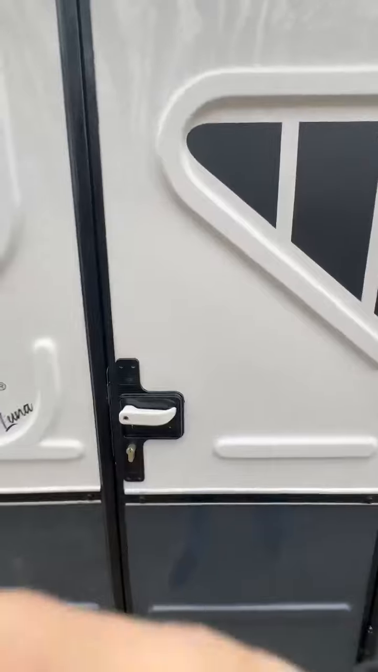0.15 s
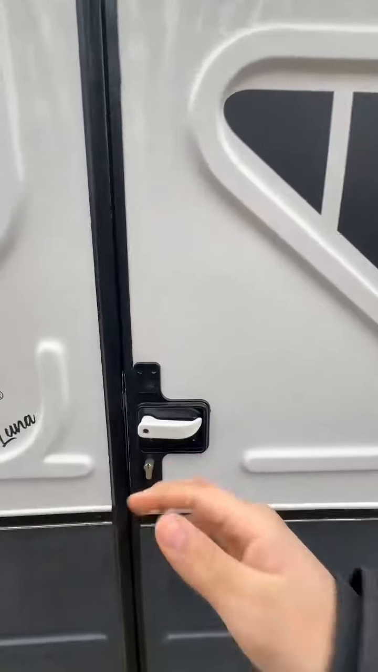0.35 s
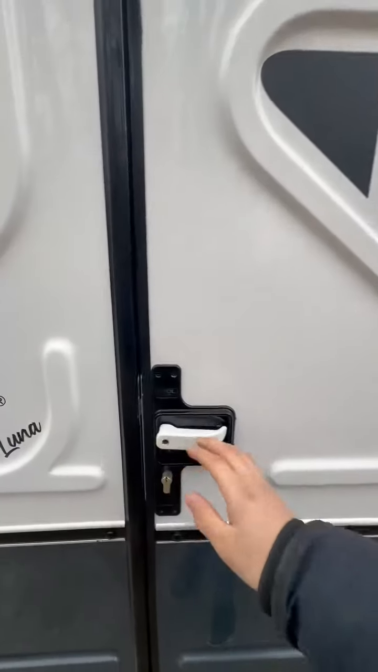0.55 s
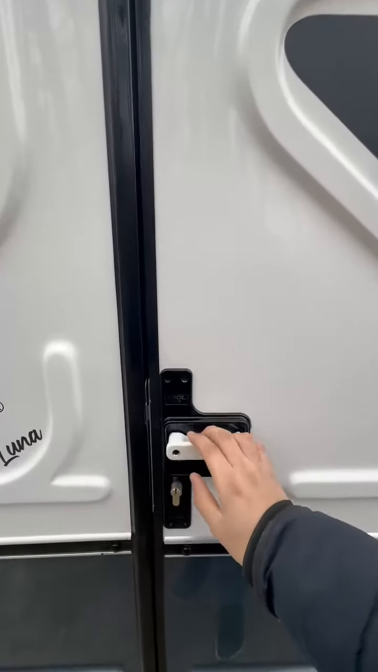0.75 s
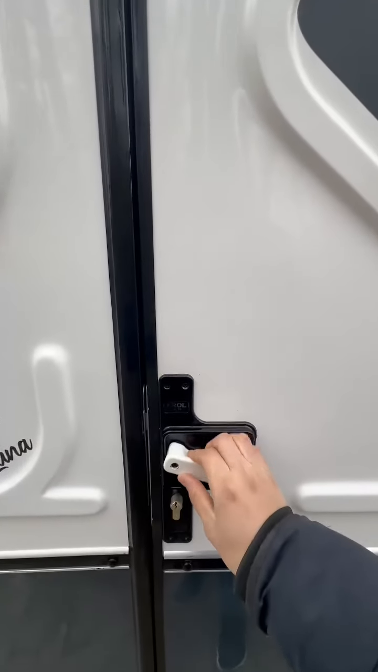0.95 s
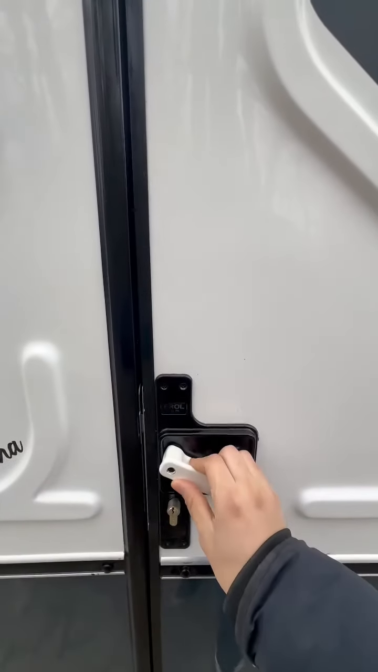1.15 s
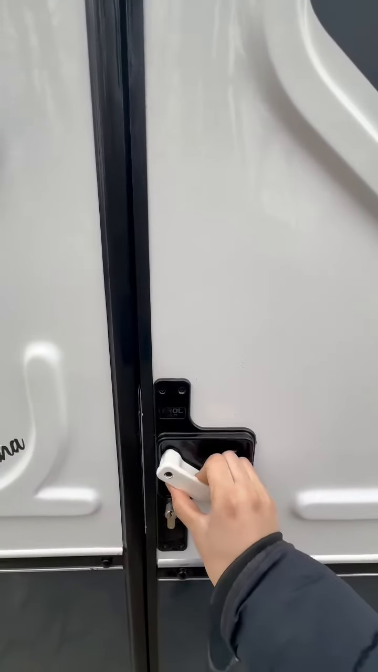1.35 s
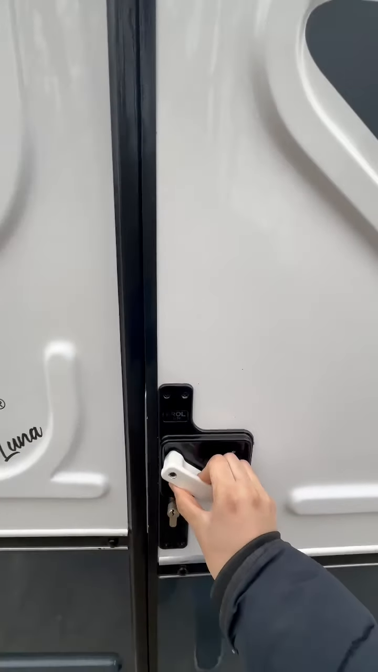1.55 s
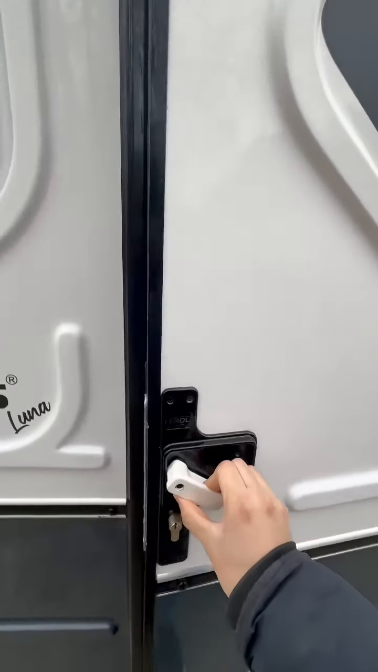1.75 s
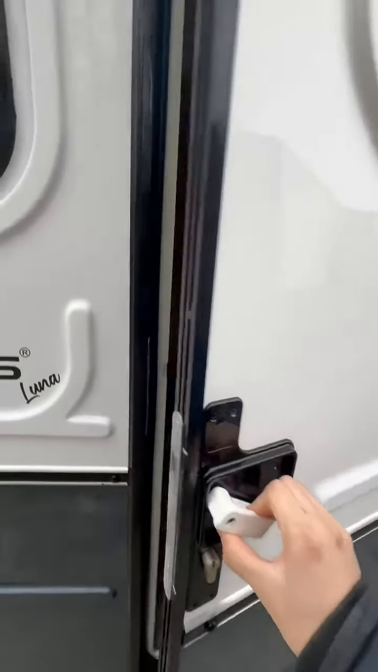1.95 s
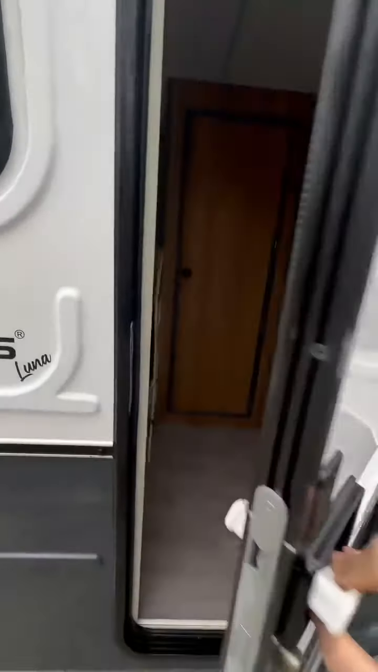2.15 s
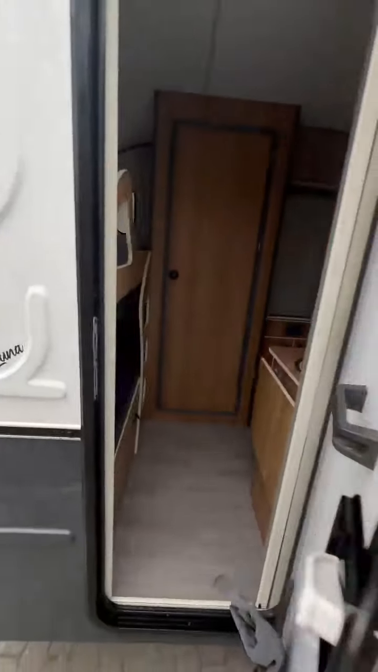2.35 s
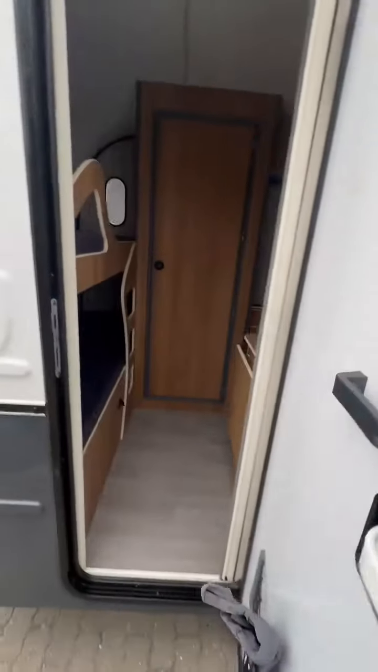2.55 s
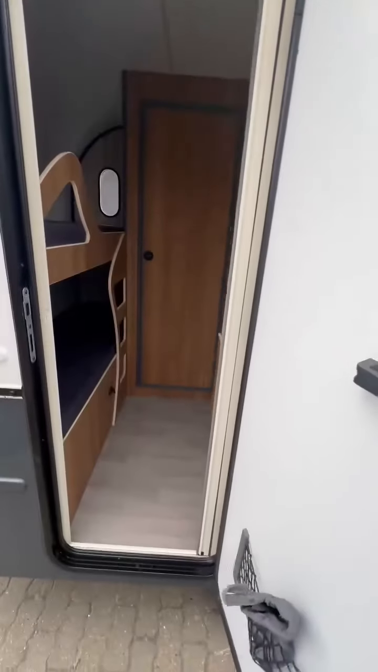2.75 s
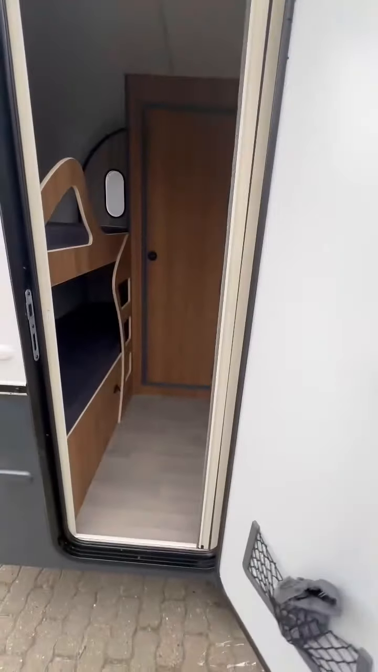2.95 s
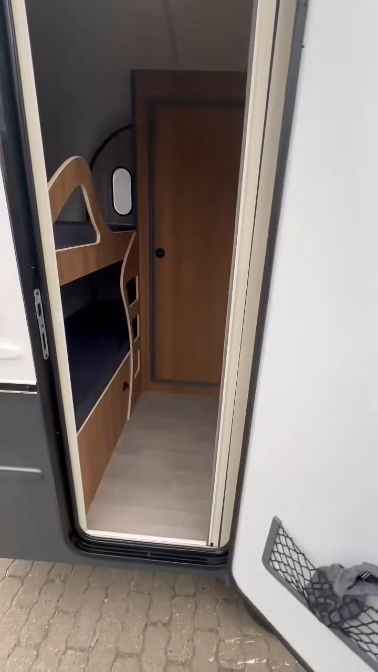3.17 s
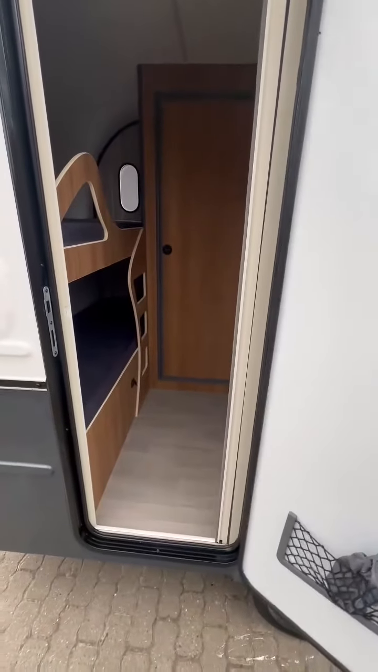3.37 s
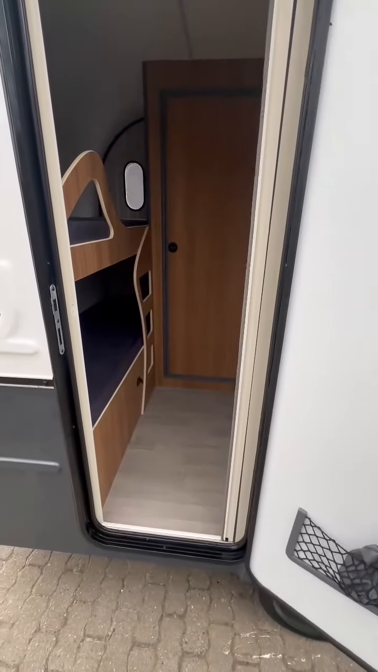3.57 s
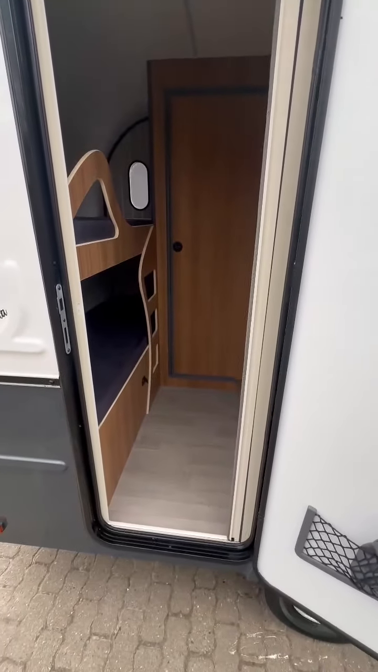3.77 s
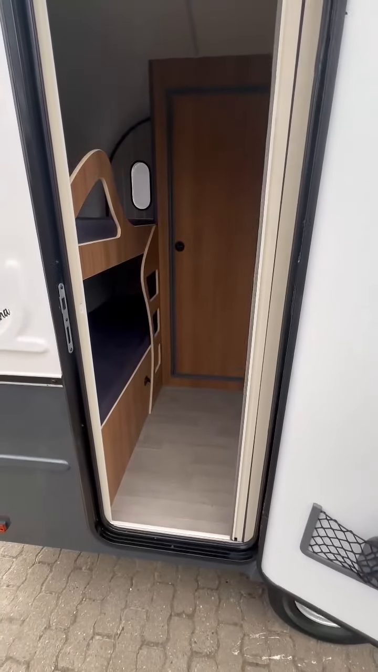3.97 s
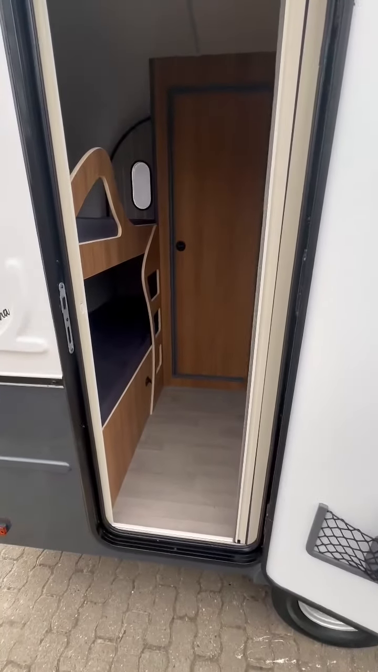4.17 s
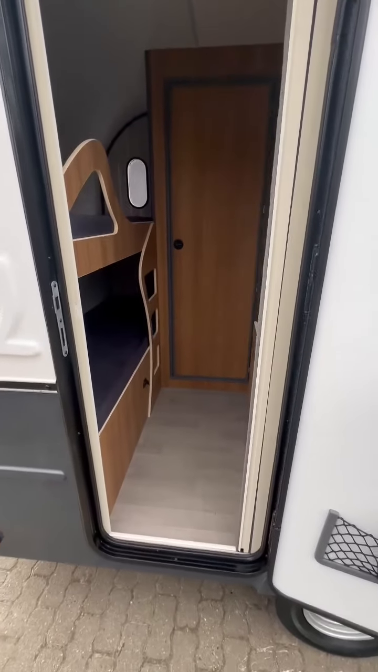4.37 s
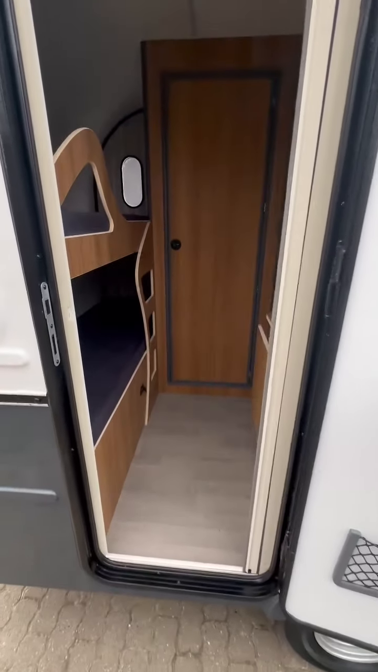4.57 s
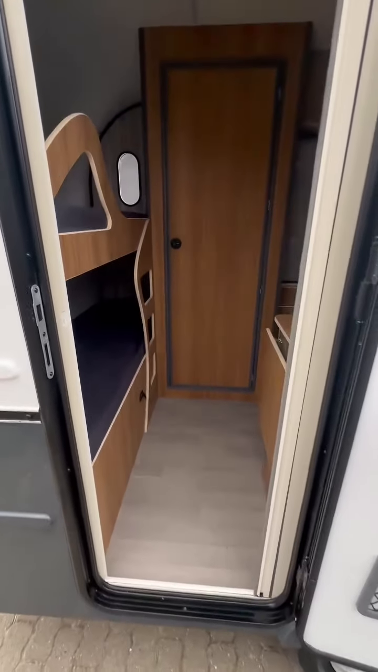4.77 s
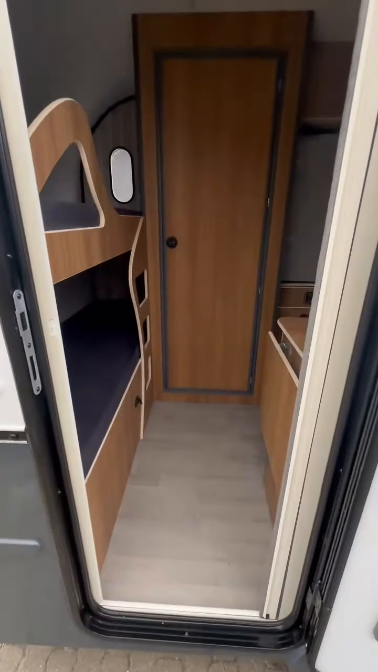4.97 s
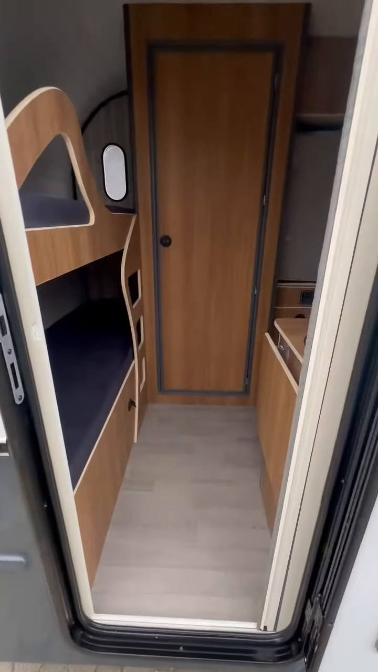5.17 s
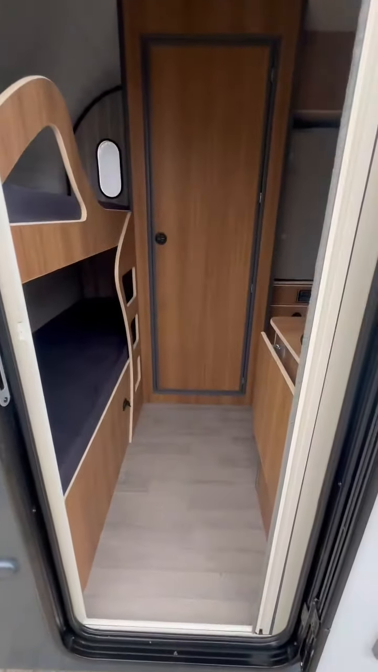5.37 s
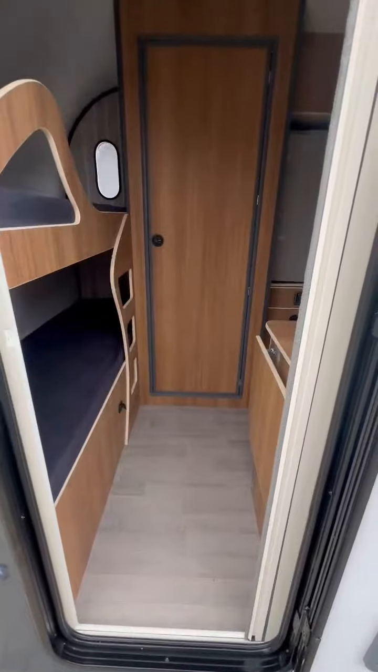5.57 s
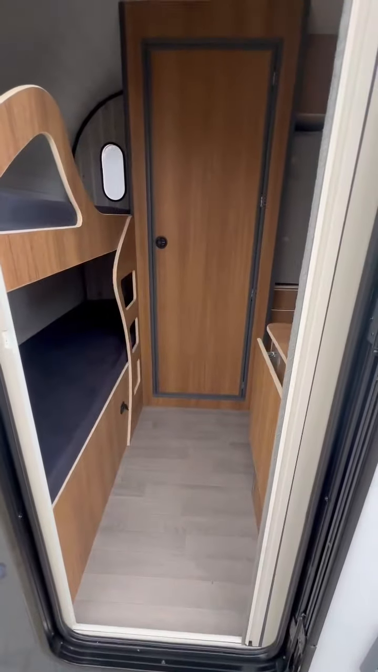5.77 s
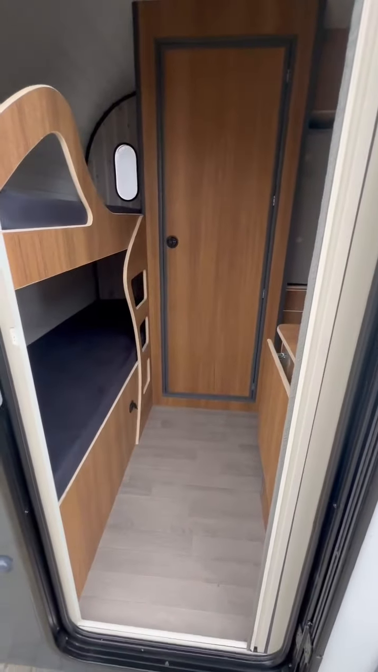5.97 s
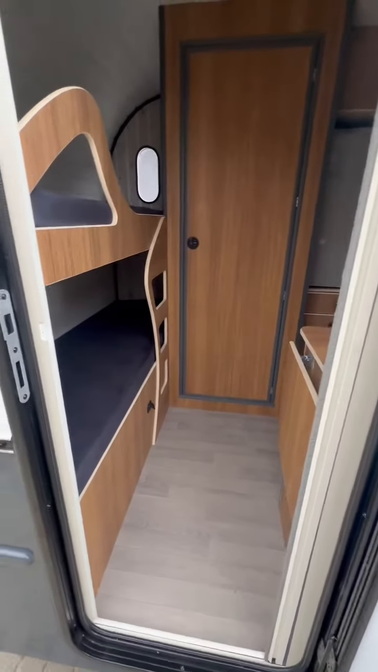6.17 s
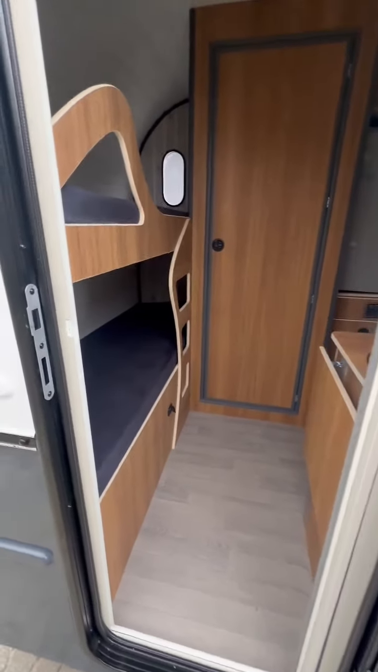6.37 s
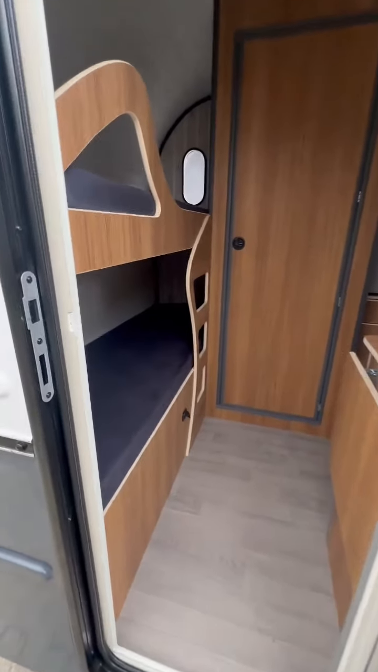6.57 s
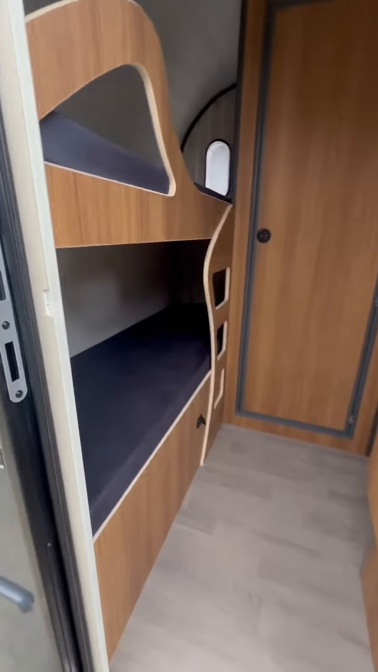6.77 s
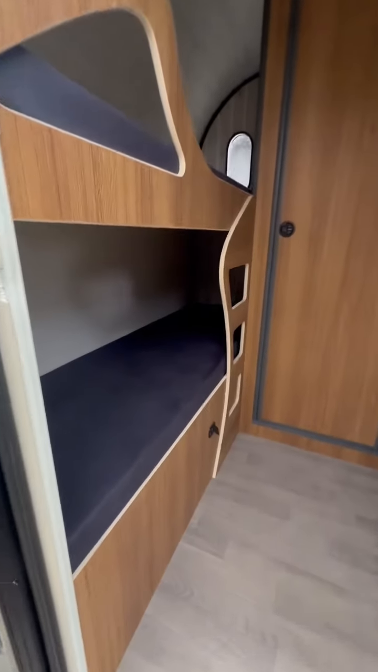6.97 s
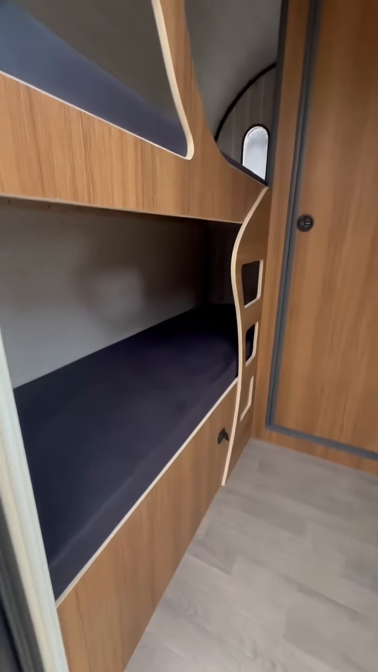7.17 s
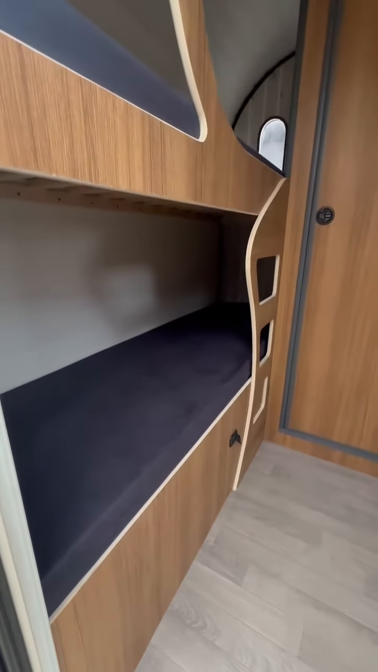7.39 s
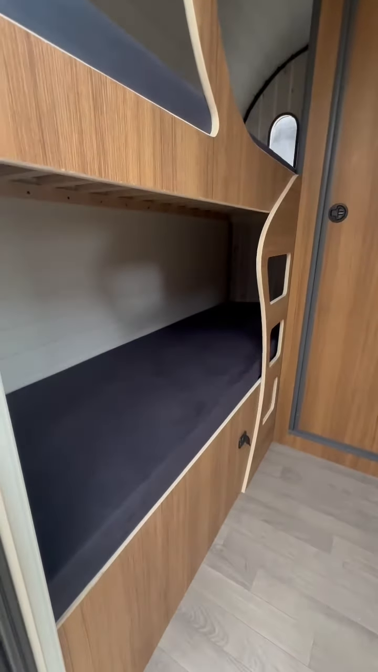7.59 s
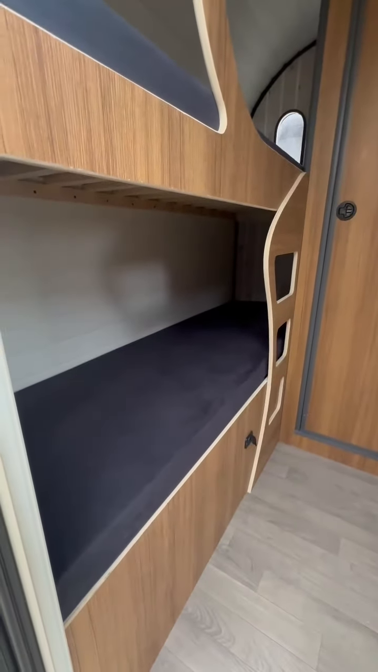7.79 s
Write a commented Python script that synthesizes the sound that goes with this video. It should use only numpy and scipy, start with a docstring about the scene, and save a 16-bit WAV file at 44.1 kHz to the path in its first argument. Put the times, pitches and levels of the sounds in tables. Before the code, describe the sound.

A caravan door latch clicks and snaps open, then the door creaks, bumps and rattles, over low wind rumble.

```python
"""A caravan door, worked by hand outdoors: the handle clicks, the bolt snaps free, the light panel booms.
Each hit is a sharp crack layered with ringing steel and a low body. The door creaks open in stick-slip
pulses, then bumps and rattles at the end of its swing. A jacket hisses faintly as the person moves,
a sleeve rustles and a shoe scuffs on grit.
Underneath, wind rumbles on the microphone and two small birds whistle far off."""
import sys
import numpy as np
from scipy import signal
from scipy.fft import rfft, irfft, next_fast_len
from scipy.io import wavfile
from scipy.ndimage import uniform_filter1d, map_coordinates

SR = 44100
rng = np.random.default_rng(int(sys.argv[2]) if len(sys.argv) > 2 else 0)


def dump(signal):
    """Clip the signal to [-1, 1] and save it as 16-bit WAV at the path in sys.argv[1]."""
    limited = np.clip(np.atleast_2d(signal).T, -1, 1)
    pcm = np.round(limited * 32767).astype(np.int16)
    wavfile.write(sys.argv[1], SR, pcm)


N = 345341
HIT_T = np.arange(16384) / SR  # time axis of one hit
HIT_HZ = np.fft.rfftfreq(len(HIT_T), 1 / SR)
BOOM_LAG_S = 0.00374  # the door's body swings out just after a contact
BED_PAN_DB = [[0.28], [-0.28]]  # left, right: wind and jacket lean slightly left

# Stereo width of ambient and of direct sound: f/Hz, left-right correlation
DIFFUSE_IMAGE = [(25, 0.96), (60, 0.97), (130, 1), (270, 0.94), (720, 0.14), (1200, 0.44), (1800, 0.69),
                 (2700, 0.5), (3600, -0.33), (5000, -0.83), (7000, 0.47), (9000, -0.44), (10500, -0.21)]
DIRECT_IMAGE = [(200, 1), (350, 0.93), (750, 1), (1100, 0.93), (1900, 0.8), (3200, 0.24), (4900, 0.45),
                (7500, 0.22), (10400, 0.6)]
# Reverb decay of the yard and of the trees: f/Hz, t60/s
YARD_DECAY = [(200, .6), (2000, 0.22), (9000, 0.11)]
TREE_DECAY = [(2000, 0.93), (8000, 0.29)]

# Tone of the wind's rumble, airy rush and eddies: f/Hz, level/dB
RUMBLE_EQ = [(13, -42.5), (22, -20), (38, -4), (75, 2.5), (96, -1), (113, -7.5), (151, -7), (181, -21.5),
             (226, -17.5), (257, -33), (300, -31.5), (390, -52), (660, -120)]
AIR_EQ = [(94, -25.5), (160, 0.5), (189, -7.5), (230, -6), (435, -7.5), (530, -8), (608, -9.5), (848, -10),
          (2490, -26), (3690, -30), (6000, -34.5), (7800, -66.5), (13200, -120)]
EDDY_EQ = [(20, -16), (45, 2.5), (70, 5), (130, -14), (260, -27), (400, -32), (600, -56)]
# Fader rides of rumble and rush, before each layer's trim: t/s, level/dB
RUMBLE_RIDE = [(0.0, -41), (0.41, -49.5), (0.76, -40.5), (0.96, -42), (1.39, -39.5), (2.18, -49),
               (2.99, -44.5), (4.29, -45.5), (4.64, -43.5), (4.88, -46), (6.21, -43), (7.57, -44),
               (7.7, -41.5), (7.83, -45.5)]
AIR_RIDE = [(0.0, -51), (0.46, -51.5), (1.35, -51.5), (2.97, -53), (4.51, -54.5), (5.19, -48), (5.37, -53),
            (7.65, -53), (7.83, -51.5)]
# Eddies hitting the microphone: t/s, length/s, level/dB
BUFFET_CUES = [(.03, 0.23, -38), (.24, 0.4, -37), (.5, 0.47, -42), (2.07, .24, -38), (2.52, 0.42, -39),
               (4.95, 0.23, -47), (5.07, .3, -35), (5.96, 0.15, -45), (7.3, .12, -43)]
# Bird notes: t/s, length/s, start f/Hz, end f/Hz, waver/Hz, relative level/dB
BIRD_NOTES = [(3.505, .055, 7880, 7240, 300, -66), (3.637, 0.07, 7720, 7200, 300, -63),
              (3.76, 0.088, 7600, 7250, 300, -62), (3.872, 0.11, 4700, 5370, 480, -56),
              (4.027, 0.06, 5230, 2800, 250, -53), (4.129, 0.065, 4500, 2706, 249, -52),
              (4.231, 0.053, 4210, 2580, 250, -52), (4.331, 0.057, 4230, 2890, 250, -53),
              (4.414, 0.065, 4700, 2880, 249, -53.5), (4.507, 0.073, 5090, 2800, 250, -53),
              (4.69, 0.071, 3500, 2620, 199, -57), (4.761, .045, 4110, 2940, 200, -55),
              (4.873, .055, 3800, 3410, 200, -54), (3.689, .05, 2400, 2400, 30.5, -62),
              (3.89, 0.077, 2280, 2360, 30, -57), (3.964, 0.064, 2760, 2690, 30, -55.5),
              (4.171, .06, 2330, 2370, 30, -57), (4.633, 0.031, 2476, 2430, 30, -47.5),
              (4.715, 0.041, 2410, 2430, 30, -55), (4.907, 0.048, 2460, 2410, 30, -50)]

# Tone of the jacket's hiss, the rubbing sleeve and a sole on paving: f/Hz, level/dB
JACKET_EQ = [(1500, -12), (3000, -0.5), (4800, -2), (6500, -2.5), (9300, -6), (10000, -19), (11000, -37.5)]
SLEEVE_EQ = [(150, -22), (300, 9.5), (1200, 5), (2800, 3), (4300, 1), (6500, 1.5), (9500, -6), (11000, -28)]
SOLE_EQ = [(200, -3), (560, 6), (750, -1), (930, -3), (1250, -6), (1650, 2.5), (2050, 6.5), (2700, 0),
           (3500, -5.5), (4000, -2), (4900, -18), (5800, -10), (9500, -13.5), (10800, -51)]
# Fader ride of the moving jacket, before its trim: t/s, level/dB
JACKET_RIDE = [(0.0, -66), (0.94, -73), (1.35, -72), (1.81, -71.5), (2.0, -62.5), (2.29, -62),
               (3.29, -79.5), (3.84, -86), (4.32, -77.5), (4.56, -70.5), (5.01, -80), (5.21, -60),
               (5.52, -71), (5.93, -66), (6.24, -74), (6.82, -60), (7.18, -67), (7.83, -79)]
# Sleeve strokes and shoe scuffs: t/s, length/s, level/dB
SLEEVE_CUES = [(.08, 0.097, -57.5), (.5, 0.1, -47.5), (1.497, 0.068, -56), (1.523, 0.14, -52.5),
               (2.28, 0.078, -67), (2.423, 0.045, -44.5), (2.98, 0.12, -57), (4.415, 0.095, -52.5),
               (4.995, 0.089, -55), (5.078, 0.13, -44.5), (5.98, 0.14, -53.5), (6.34, 0.22, -54.5)]
SHOE_CUES = [(7.078, 0.016, -47.5), (7.133, 0.039, -52), (7.228, 0.048, -46), (7.2415, 0.1, -35.5)]

# Handle, seal and hinges rubbing, the panel shuddering: t/s, length/s, level/dB, f/Hz, sharpness
RUB_CUES = [(3.372, 0.2, -63.5, 2560, 9.6), (1.175, 0.26, -52.5, 2160, 3.1), (1.286, 0.017, -40, 1500, 1.5),
            (1.796, 0.13, -46.5, 244, 6.6), (2.038, 0.41, -64.5, 1340, 22), (2.099, 0.37, -82, 2820, 18),
            (3.1, 0.81, -60.5, 535, 24.5), (4.993, 0.03, -46, 1950, 3.6), (5.089, .22, -53, 410, 1.45),
            (2.55, .5, -46.5, 130, 3.4)]
# Knocks of the swinging door: t/s, level/dB, centre f/Hz, frame boom level/dB
KNOCK_CUES = [(2.324, -42, 750, -59.5), (2.421, -50.5, 1390, -65), (2.434, -52, 1600, -67),
              (2.5311, -39, 1020, -44), (2.531, -40.5, 5600, -68), (2.70, -41, 390, -39),
              (2.823, -40, 167, -47), (2.851, -47.5, 1026, -51), (2.997, -48, 447, -35),
              (3.022, -46, 504, -38), (3.031, -38.5, 152, -39), (4.443, -46.5, 5800, -65),
              (4.682, -38.5, 868, -24), (4.818, -60, 299.5, -23.5), (4.999, -45.5, 2000, -65),
              (5.0547, -32.5, 3270, -55), (5.0561, -18.5, 960, -47), (5.059, -32, 3050, -48),
              (5.0617, -26, 940, -6), (5.0923, -37, 7900, -51), (5.0923, -38, 1880, -39),
              (5.138, -54, 6800, -65), (5.161, -42, 1200, -36), (5.187, -45, 710, -31),
              (5.253, -41, 1140, -34), (5.2726, -39.5, 1080, -29.5), (5.314, -47, 870, -50),
              (5.39, -45.5, 1130, -63)]
# Contacts of handle and bolt: t/s, level/dB, centre f/Hz, panel boom level/dB
LATCH_CUES = [(0.501, -44, 1480, -67), (0.526, -48, 4700, -66), (0.537, -34, 251, -33),
              (0.6043, -22, 1080, -27.5), (0.6108, -36.5, 1700, -37), (0.679, -60, 252, -37.5),
              (0.8583, -36, 1200, -38.5), (0.8627, -29, 393, -27.5), (0.9004, -46, 1370, -60),
              (0.971, -43.5, 4270, -52.5), (0.9765, -39.5, 990, -39.5), (1.0382, -39, 4150, -52),
              (1.206, -49, 2110, -44), (1.295, -31.5, 2200, -66), (1.3015, -19.5, 1220, -41),
              (1.3045, -18.5, 3600, -33.5), (1.306, -14, 2730, -5), (1.307, -16.5, 1220, -30),
              (1.3086, -19, 1350, -42.5), (1.312, -29.5, 4500, -54), (1.386, -42, 1200, -33.5),
              (1.54, -61.5, 250, -31), (1.5972, -47.5, 1000, -36)]
# Modes of the creaking door, its frame, its panel and the lock's steel: f/Hz, level/dB, t60/s
SLIP_MODES = [(816, 7.5, 0.057), (786, 11, 0.042), (235, 6, 0.062), (2100, 11.5, 0.011)]
FRAME_MODES = [(80, -0.5, 0.031), (132, -9.5, 0.14), (232.4, 2.5, 0.045), (262, 0.5, 0.058),
               (453, -28, 0.16), (496, -25, 0.097), (790, -24.5, 0.098), (1042, -38, .1),
               (1165, -27, 0.084)]
PANEL_MODES = [(60.3, -13, .2), (81.3, 3, 0.13), (127.3, 8, 0.067), (187, 5, 0.036), (263.5, -2.5, 0.061),
               (299.5, -3.5, .064), (413, -1, 0.033), (428.5, -20.5, 0.085), (534, -26, 0.21),
               (651, -28.5, 0.14)]
STEEL_MODES = [(1096, 3.5, .06), (1480, -8, .06), (1594, -8, 0.054), (1850, -1.5, 0.039), (2290, -1.5, .06),
               (2967, -3, .068), (3454, -5.5, 0.042), (4272, -15.5, .045), (5090, -12, .07),
               (5549, -14, .08), (5930, -7.5, 0.071), (7350, -19, .13)]
# Colour of the latch housing: f/Hz, level/dB
HOUSING_EQ = [(400, 1.5), (560, -1), (740, 3.5), (920, -5.5), (1100, 0.5), (1450, -2.5), (1880, -3.5),
              (2500, -7), (2850, -1.5), (3350, 1.5), (3720, -8), (4250, -2), (4950, -2.5), (5350, 1.5),
              (5950, -3), (6350, 0), (6800, -4.5), (7700, -1.5), (9300, 2), (10400, 3), (11200, -18.5)]
# Phase lead of the door in the left channel: f/Hz, phase/rad
DOOR_PHASE = [(150, 0), (350, -.2), (700, -1.15), (1100, -.15), (3000, .3), (5000, -2.4), (8500, -2)]
# Pan of the door, added on the left and taken off the right: f/Hz, level/dB
DOOR_PAN = [(150, -0.65), (330, 1.0), (650, -2.7), (1100, -2), (2200, -0.042), (4500, 1.0), (9000, 0.78)]


def amp(db):
    """Decibels to gain."""
    return 10 ** (np.asarray(db) / 20)


def unit(x):
    """Scale to rms 1."""
    return x / np.sqrt(np.mean(x ** 2) + 1e-20)


def along(points, hz):
    """Read (f, value) points on a log frequency axis."""
    f, v = np.transpose(points)
    return np.interp(np.log(hz + 1), np.log(f + 1), v)


def ride(points):
    """A fader move: straight lines through (t, value) points."""
    return np.interp(np.arange(N) / SR, *np.transpose(points))


def add(track, s, sound):
    """Mix a sound into a track at s seconds."""
    start = round(s * SR)
    track[..., start:start + sound.shape[-1]] += sound[..., :N - start]


def wobble(rate):
    """A smooth random curve with rate knots a second."""
    knots = rng.standard_normal(int(N * rate / SR) + 4)
    return map_coordinates(knots, [np.arange(N) * rate / SR])


def filtered(x, response):
    """Apply a gain given as a function of frequency."""
    size = x.shape[-1]
    padded = next_fast_len(size + size // 8)
    return irfft(rfft(x, padded) * response(np.fft.rfftfreq(padded, 1 / SR)), padded)[..., :size]


def stereo_noise(image, size):
    """White noise whose left-right correlation follows the image table."""
    def mid_side_gains(hz):
        angle = np.arccos(along(image, hz)) / 2
        return np.array([np.cos(angle), np.sin(angle)])
    mid, side = filtered(rng.standard_normal((2, size)), mid_side_gains)
    return np.array([mid + side, mid - side])


def rush(eq):
    """Coloured, diffuse stereo noise of rms 1."""
    return unit(filtered(stereo_noise(DIFFUSE_IMAGE, N), lambda hz: amp(along(eq, hz))))


def pressure(strokes, hold):
    """Force envelope: each stroke catches at once, holds for a share of its length and tails off."""
    force = np.zeros(N)
    for s, length, db in strokes:
        progress = np.linspace(0, 1, int(length * SR))
        add(force, s, amp(db) * np.interp(progress, [0, hold, .44, .6, 1], [1, 1, .85, .37, .071]))
    return force


def reverb(x, decay):
    """A diffuse tail in which each frequency dies at its own speed."""
    hz, t, spectra = signal.stft(rng.standard_normal((2, SR // 2)), SR, nperseg=256)
    tail = signal.istft(spectra * amp(-60 * t / along(decay, hz)[:, None]), SR, nperseg=256)[1]
    return signal.fftconvolve(np.atleast_2d(x), tail / np.linalg.norm(tail[0]), axes=1)[:, :N]


def patchy(x, depth_db):
    """Let the gain drift in small patches of frequency and time."""
    spectra = signal.stft(x, nperseg=1024)[2]
    patches = uniform_filter1d(rng.standard_normal(spectra.shape[1:]), size=4, axis=0)
    patches = uniform_filter1d(patches, size=9, axis=1)
    return unit(signal.istft(spectra * amp(depth_db * unit(patches)), nperseg=1024)[1][:, :N])


def wind():
    """The bed: a lumpy rumble on the microphone and the broad rush of open air."""
    rumble = amp(ride(RUMBLE_RIDE) + 2.5 + 0.28 * wobble(5.9)) * rush(RUMBLE_EQ)
    rumble = filtered(rumble, lambda hz: hz ** 8 / (hz ** 8 + 34 ** 8))  # steep low cut
    air = amp(ride(AIR_RIDE) + 2 + 0.23 * wobble(13)) * patchy(rush(AIR_EQ), depth_db=2.5)
    return amp(BED_PAN_DB) * (rumble + air)


def buffets():
    """Eddies push on one microphone port while they pull on the other."""
    eddy = unit(filtered(rng.standard_normal(N), lambda hz: amp(along(EDDY_EQ, hz))))
    force = uniform_filter1d(pressure(BUFFET_CUES, hold=0.38), size=1500)
    return np.outer([1, -1], force * eddy)


def birds():
    """Gliding, wavering, fluttering whistles, blurred by the distant trees."""
    song = np.zeros(N)
    waver = wobble(700)
    for s, length, start_hz, end_hz, waver_hz, db in BIRD_NOTES:
        size = int(length * SR)
        pitch = np.linspace(start_hz, end_hz, size) + waver_hz * waver[round(s * SR):][:size]
        whistle = np.sin(2 * np.pi * np.cumsum(pitch) / SR)
        add(song, s, amp(db) * signal.windows.tukey(size, .6) * whistle)
    song *= unit(amp(3 * wobble(110)))  # flutter
    return amp(-7.5) * song + amp(-3) * reverb(song, TREE_DECAY)


def jacket():
    """The faint hiss of a jacket, swelling and fading as the person moves."""
    movement = amp(ride(JACKET_RIDE) + 4.5 + 0.5 * wobble(21))
    return amp(BED_PAN_DB) * movement * patchy(rush(JACKET_EQ), depth_db=6)


def sleeve():
    """Cloth takes hold gently and rubs in fine, uneven slips."""
    slip_hz = 230 * amp(6.8 * wobble(90))
    slip_phase = np.cumsum(slip_hz) / SR % 1
    texture = amp(2 * wobble(500) - 5 * slip_phase)
    force = uniform_filter1d(pressure(SLEEVE_CUES, hold=0.07), size=700)
    return force * unit(rush(SLEEVE_EQ) * texture)


def shoe():
    """A sole scrapes the paving and crushes grit; a close echo off the step makes it hollow."""
    grains_per_s, echo_s, echo_gain = 910, .00313, 0.79
    grains = (rng.random(N) < grains_per_s / SR) * rng.standard_normal((2, N))
    grains *= amp(rng.standard_normal(N).clip(-2, 2))  # spread in size
    mid, side = filtered(grains, lambda hz: amp(along(SOLE_EQ, hz)))
    side = filtered(side, lambda hz: hz / (hz + 2500))  # wider in the treble
    grit = unit(np.array([mid + side, mid - side]))
    scrape = rush(SOLE_EQ) * amp(0.92 * wobble(200))
    scuffs = pressure(SHOE_CUES, hold=0.011) * unit(scrape + amp(-2) * grit)
    hollow = filtered(scuffs, lambda hz: 1 + echo_gain * np.exp(-2j * np.pi * hz * echo_s))
    return hollow / np.hypot(1, echo_gain)


def minimum_phase(gain):
    """The response with this gain and no pre-ring, so attacks stay crisp."""
    cepstrum = irfft(np.log(np.maximum(gain, 1e-6)))
    half = len(cepstrum) // 2
    cepstrum[1:half] *= 2
    cepstrum[half + 1:] = 0
    return np.exp(rfft(cepstrum))


def hump(hz, centre_hz, rise, fall):
    """Band shape of a contact: harder ones centre higher; rise and fall are the powers of its skirts."""
    ratio = (hz + 1) / centre_hz
    return 1 / np.sqrt(ratio ** (-2 * rise) + ratio ** (2 * fall))


def crack(centre_hz, t60, rise, fall):
    """A contact's transient: a sharp push and a dense, dying shiver, with the energy of 10 ms at rms 1."""
    push_share, push_s = 0.15, .001
    envelope = amp(-60 * HIT_T / t60) * (1 - np.exp(-HIT_T / 0.0019))
    shiver = unit(stereo_noise(DIRECT_IMAGE, len(HIT_T)) * envelope)
    push = unit(signal.unit_impulse(len(HIT_T), round(push_s * SR)))
    spectrum = rfft(np.sqrt(push_share) * push + np.sqrt(1 - push_share) * shiver)
    power = np.mean(np.abs(spectrum) ** 2, axis=0)
    ripple = np.sqrt(np.abs(uniform_filter1d(power, size=100)))  # chance colour, evened out below
    cushion = 1 / np.sqrt(1 + (HIT_HZ / (5.5 * centre_hz)) ** 4)  # soft contacts miss the treble
    tone = cushion * hump(HIT_HZ, centre_hz, rise, fall) / ripple
    return unit(irfft(spectrum * minimum_phase(tone))) * np.sqrt(0.01 * SR / len(HIT_T))


def ring(modes, attack_s, scatter_db):
    """Damped modes, at new strengths for every blow."""
    waves = np.zeros(len(HIT_T))
    for hz, db, t60 in modes:
        envelope = amp(db + scatter_db * rng.standard_normal() - 60 * HIT_T / t60)
        waves -= envelope * np.sin(2 * np.pi * hz * HIT_T)
    return waves * (1 - np.exp(-HIT_T / attack_s))


def steel(centre_hz, longest_t60):
    """The lock's steel parts ring most near the contact's centre pitch, differently left and right."""
    modes = [(hz, db + 20 * np.log10(hump(hz, centre_hz, rise=.6, fall=.46)), min(t60, longest_t60))
             for hz, db, t60 in STEEL_MODES]
    mid, side = [ring(modes, attack_s=0.00045, scatter_db=3) for _ in range(2)]
    side = filtered(side, lambda hz: 1j * hz / (hz + 4000))
    return np.array([mid + side, mid - side])


def rubs():
    """Sliding and shuddering parts of the door hum as bands of noise."""
    out = np.zeros((2, N))
    for s, length, db, centre_hz, sharpness in RUB_CUES:
        size = int(length * SR)
        noise = stereo_noise(DIRECT_IMAGE, size)
        band = filtered(noise, lambda hz: hump(hz, centre_hz, sharpness, sharpness))
        add(out, s, amp(db) * unit(band) * signal.windows.tukey(size, .5))
    return out


def creak():
    """The door sticks and slips ever faster; long sticks let go hard, quick ones merge and sing."""
    first_gap_s, shortest_gap_s, gap_shrink = .052, .0128, .7
    swell_peak_s, swell_width_s = 1.909, 0.044
    out = np.zeros((2, N))
    s, strain = 1.6888, .85
    for grip in gap_shrink ** np.arange(15):
        slip = amp(-57 + 16 * strain) * crack(1700 - 10 * strain, t60=0.017, rise=0.1, fall=2.66)
        swell = amp(-42.5) / np.hypot(1, ((s - swell_peak_s) / swell_width_s) ** 2)
        add(out, s, slip + swell * ring(SLIP_MODES, attack_s=0.0046, scatter_db=1))
        s += shortest_gap_s + (first_gap_s - shortest_gap_s) * grip
        strain = grip
    return out


def knocks():
    """The open door jolts, bumps and rattles; its frame booms and its lock rings faintly."""
    out = np.zeros((2, N))
    for s, db, centre_hz, boom_db in KNOCK_CUES:
        lock = amp(-6.5) * steel(centre_hz, longest_t60=.04)  # choked by the door's padding
        knock = crack(centre_hz, t60=.017 + 11 / centre_hz, rise=0.84, fall=3.23)
        add(out, s, amp(db) * (knock + lock))
        add(out, s + BOOM_LAG_S, amp(boom_db) * ring(FRAME_MODES, attack_s=0.006, scatter_db=1))
    return out


def latch():
    """Each contact of handle and bolt cracks in the housing, rings the steel and shakes the panel."""
    out = np.zeros((2, N))
    housing = minimum_phase(amp(along(HOUSING_EQ, HIT_HZ)))
    for s, db, centre_hz, boom_db in LATCH_CUES:
        t60 = 0.012 + 3.9 / centre_hz  # dull contacts last longer
        click = irfft(rfft(crack(centre_hz, t60, rise=0.94, fall=1.75)) * housing)
        metal = amp(-11) * steel(centre_hz, longest_t60=.08)
        add(out, s, amp(db) * (click + metal))
        add(out, s + BOOM_LAG_S, amp(boom_db) * ring(PANEL_MODES, attack_s=0.0038, scatter_db=1.5))
    return out


def door_position(hz):
    """Left and right gain and phase that place the door a little to the right."""
    pan = amp(np.outer([1, -1], along(DOOR_PAN, hz)))
    return pan * np.exp(np.outer([.5j, -.5j], along(DOOR_PHASE, hz)))


def scene():
    """The mix: the door up front with a touch of yard reverb, over foley, birds and wind."""
    door = latch() + creak() + knocks() + rubs()
    low_cut = signal.butter(3, 44, "highpass", fs=SR, output="sos")  # the door's sounds carry no deep bass
    door = filtered(signal.sosfilt(low_cut, door), door_position)
    yard = amp(-21.5) * reverb(door, YARD_DECAY)
    return door + yard + sleeve() + shoe() + birds() + wind() + jacket() + buffets()


def record(dry):
    """The master: a soft clip rounds the highest peaks, then a steep low-pass trims the top."""
    ceiling, top_hz = .95, 11050
    rounded = dry / (1 + np.abs(dry / ceiling) ** 6) ** (1 / 6)
    return filtered(rounded, lambda hz: 1 / np.sqrt(1 + (hz / top_hz) ** 80))


dry = scene()
out = record(dry)
dump(out)
```